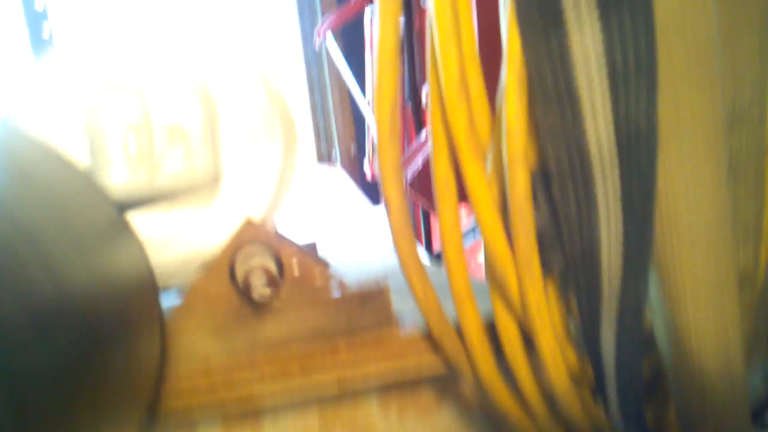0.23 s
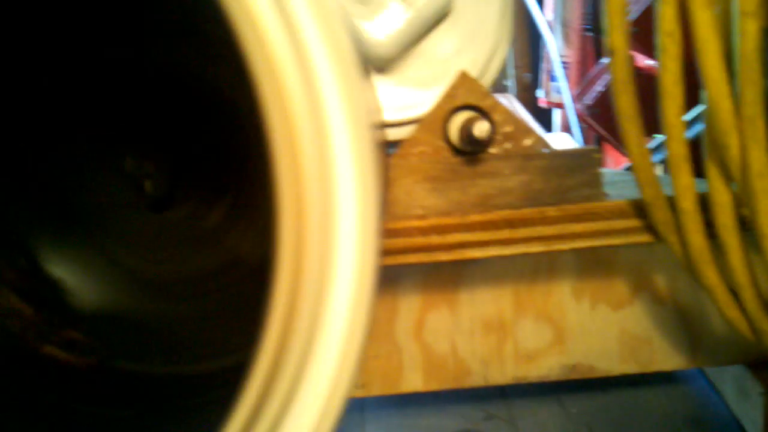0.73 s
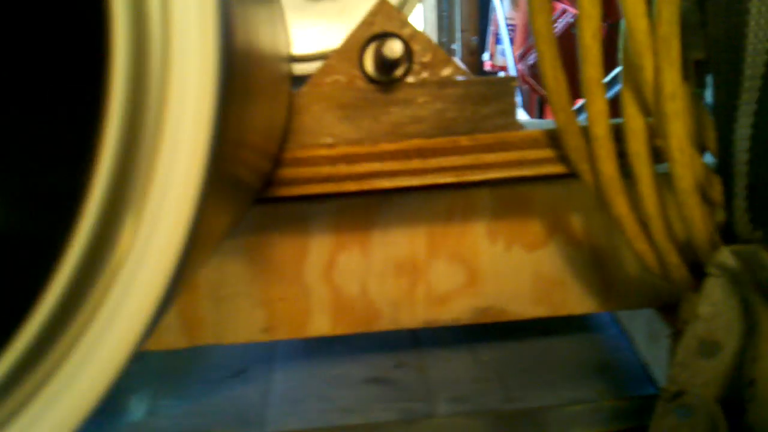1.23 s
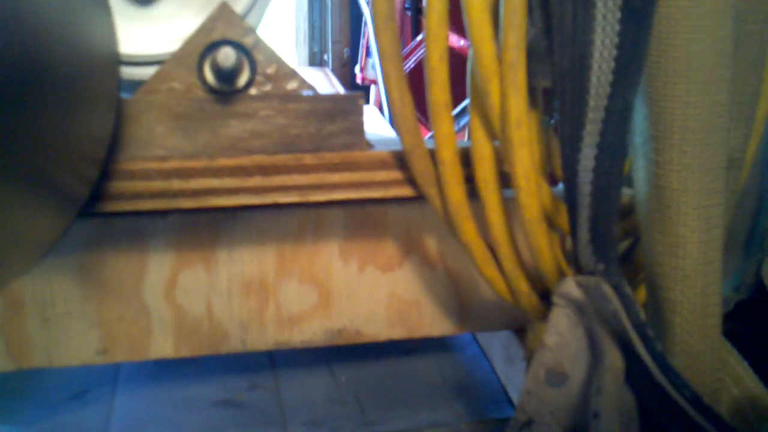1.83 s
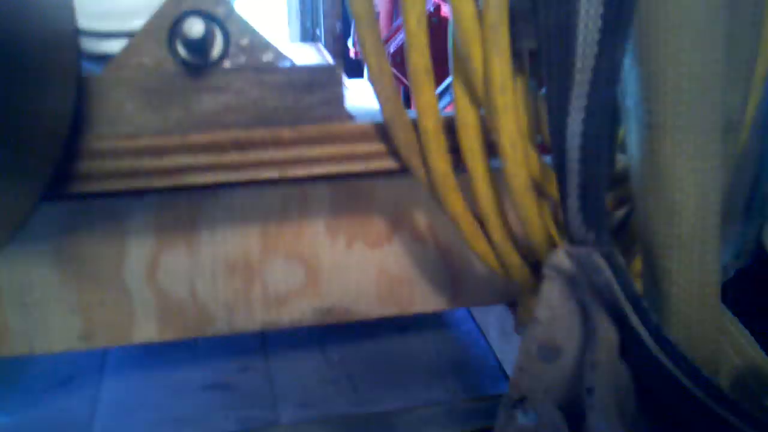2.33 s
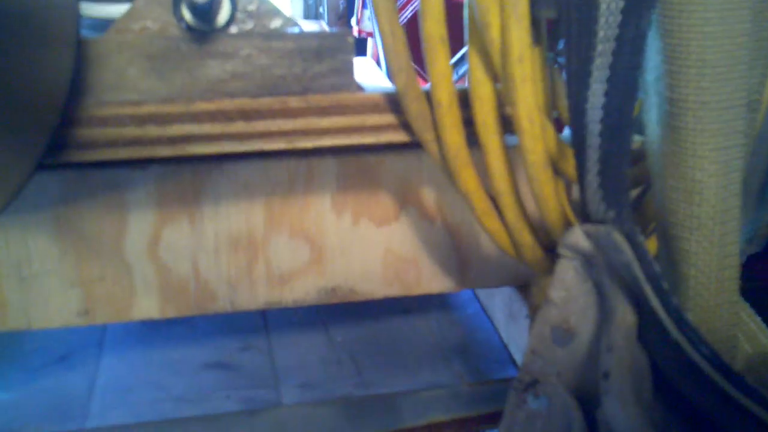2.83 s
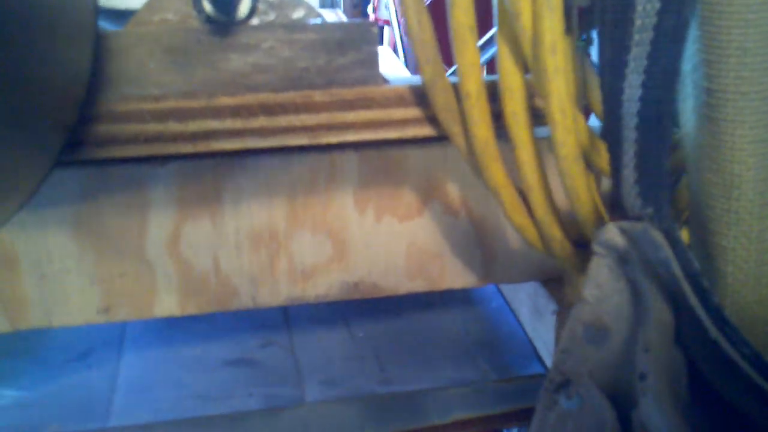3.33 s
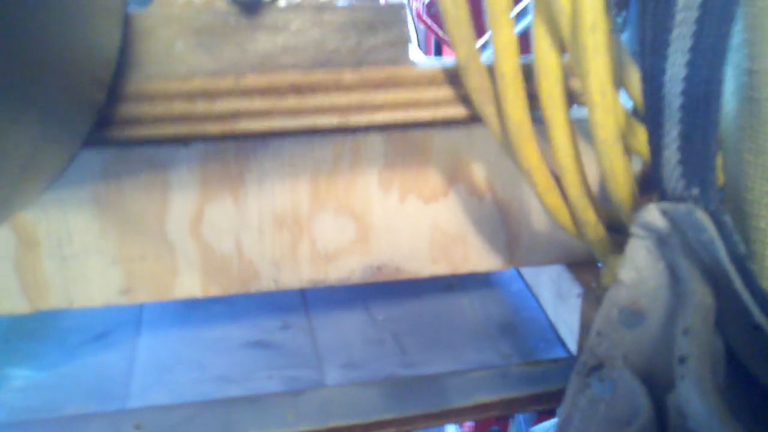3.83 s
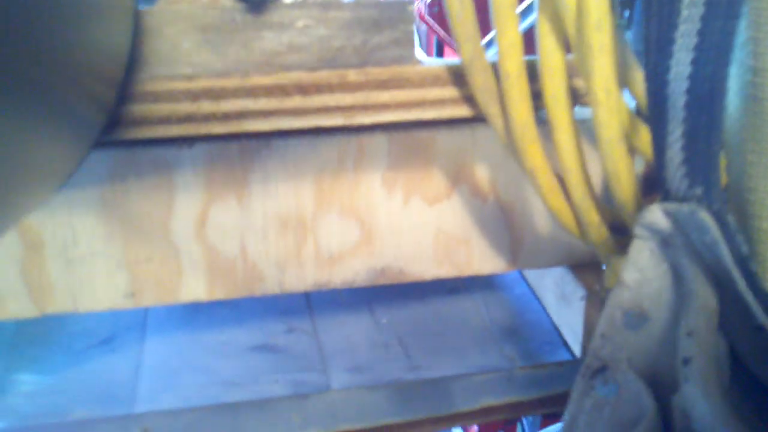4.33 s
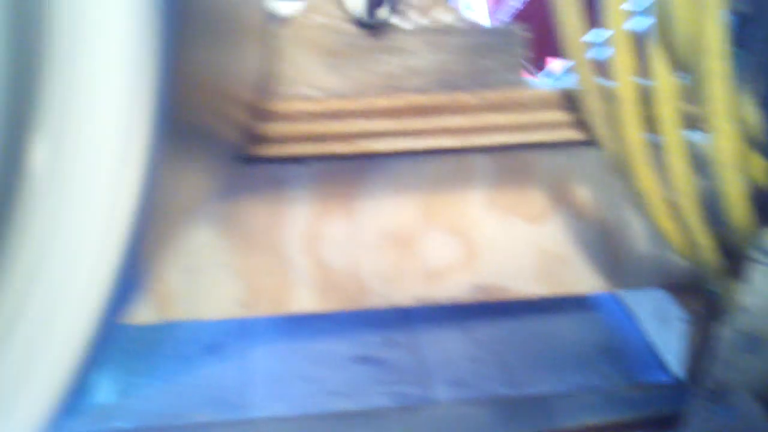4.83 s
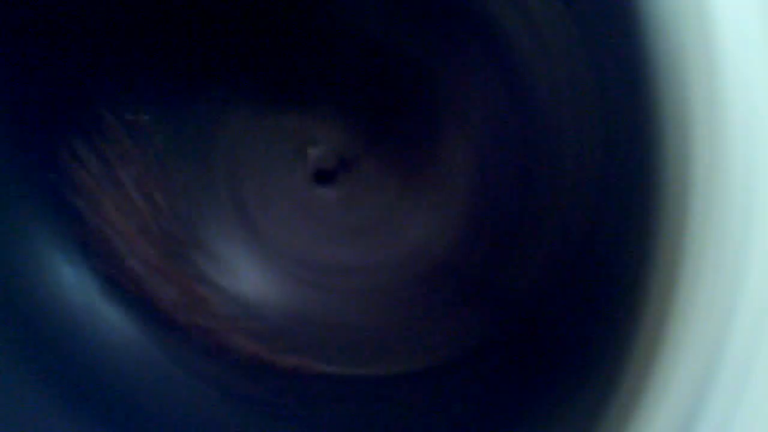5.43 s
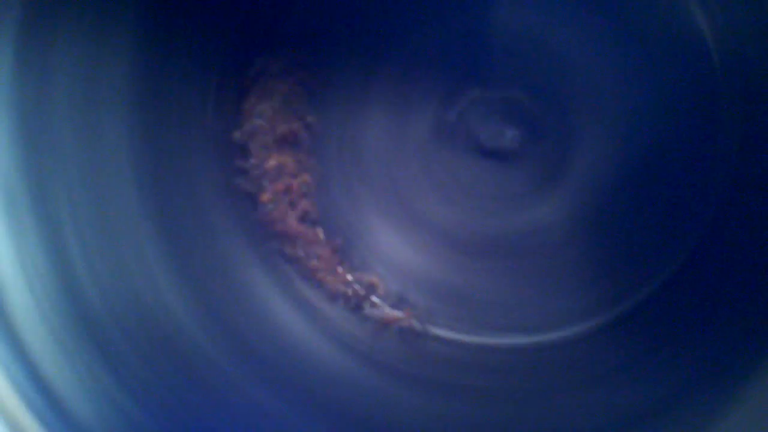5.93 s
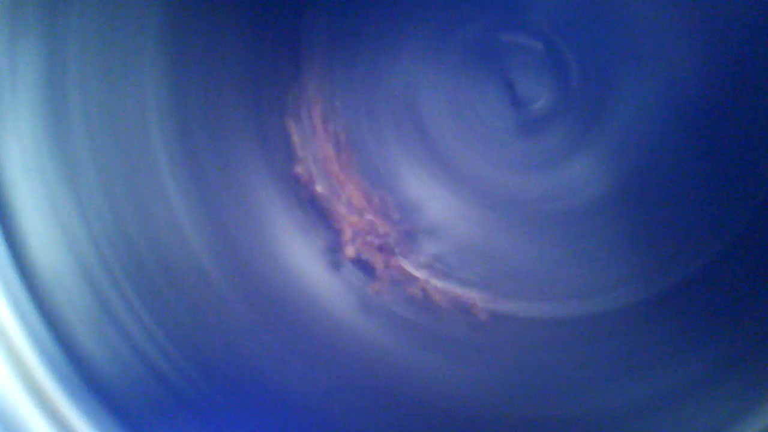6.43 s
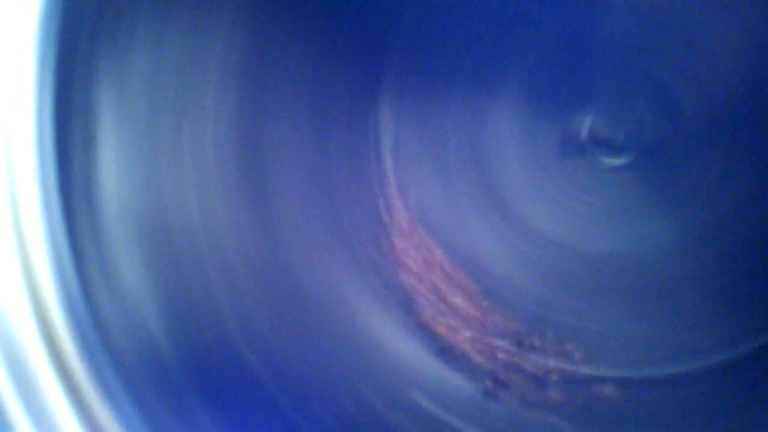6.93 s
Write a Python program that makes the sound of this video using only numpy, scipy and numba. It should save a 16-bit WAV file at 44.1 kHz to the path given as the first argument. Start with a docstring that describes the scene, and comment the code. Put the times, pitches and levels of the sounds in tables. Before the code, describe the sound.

A home-built drum mill rattles steadily up close, its charge tumbling with gritty hiss and irregular clacks over motor whine, a hard knock near the end.

```python
"""A home workshop: a ball mill's drum turns on motor-driven rollers in a wooden frame, by a hand-held camera.
The charge tumbles in bursts of tiny blows; ordinary clacks mark the roller's turns, others scatter among them.
Filtered grains hiss as grit, tones make the motor whine and metal sing, and a low resonance booms.
Near the end a knock and its rebound shake the camera's case; its gain control ducks on overload."""
import sys
import numpy as np
from scipy import signal
from scipy.fft import rfft, irfft, next_fast_len
from scipy.io import wavfile
from scipy.ndimage import uniform_filter1d
from numba import njit

SR = 44100
rng = np.random.default_rng(int(sys.argv[2]) if len(sys.argv) > 2 else 0)


def generate_wav(sig):
    """Save sig (samples, or channels by samples) to the path in sys.argv[1] as 16-bit PCM at SR."""
    pcm = np.round(np.clip(np.atleast_2d(sig).T, -1, 1) * 32767).astype(np.int16)
    wavfile.write(sys.argv[1], SR, pcm)


N = 317520
TIME = np.arange(N) / SR
SIZE = next_fast_len(N + 16384)
FREQ = np.maximum(np.arange(SIZE // 2 + 1) * SR / SIZE, 1)
PORT_LAG_S = 17 / SR
# turns per second; the small roller drives the drum
ROLLER_HZ, DRUM_HZ = 12.8, 2.38


def undb(db):
    """Decibels to gain."""
    return 10 ** (np.asarray(db) / 20)


def unit(x):
    """Scale to rms 1."""
    return x / np.sqrt(np.mean(np.abs(x) ** 2, axis=-1, keepdims=True))


def over_time(table):
    """Columns of a time table, joined by straight lines."""
    s, *columns = np.transpose(table)
    return [np.interp(TIME, s, c) for c in columns]


def over_pitch(table):
    """Columns of a spectrum, joined on a log-frequency axis."""
    hz, *columns = np.transpose(table)
    return [np.interp(np.log(FREQ), np.log(hz), c) for c in columns]


def walk(rate_hz):
    """Random levels held 1 / rate_hz and smoothed twice, rms 1."""
    hold = int(SR / rate_hz)
    steps = rng.standard_normal(N)[np.arange(N) // hold]
    return unit(uniform_filter1d(uniform_filter1d(steps, hold), hold))


def swell(x, width):
    """Bell-shaped rise, 1 at x = 0."""
    return np.exp(-(x / width) ** 2)


def ring(x, hz, width_hz):
    """One resonance, gain 1 at its centre."""
    return signal.lfilter(*signal.iirpeak(hz, max(hz / width_hz, 1), fs=SR), x)


def resonate(x, db):
    """Minimum-phase filter of the given dB shape; it keeps the energy of a click."""
    cepstrum = irfft(np.log(unit(undb(db))), SIZE)
    # folding the cepstrum makes the filter causal
    cepstrum[1:SIZE // 2] *= 2
    cepstrum[SIZE // 2 + 1:] = 0
    return irfft(rfft(x, SIZE) * np.exp(rfft(cepstrum)), SIZE)[..., :N]


def motor(wobble=0.0026, waver_db=1.6, load_db=1.6, load_place=0.61, hum_db=-62):
    """Shaft harmonics waver at random and swell once per drum turn, over a faint mains hum."""
    # motor shaft speed: start_s, turns_per_s
    shaft = [(0, 29.75), (.7, 29.55), (3.9, 29.6), (4.2, 29.45), (6, 29.48), (7.2, 29.56)]
    # whine partials: shaft_multiple, relative_db
    partials = [(23, -50), (24, -36), (25, -45.5)]
    # whine as the camera moves along the frame: start_s, relative_db
    course = [(0, -9), (.45, -2), (1.35, 0), (1.7, -8), (2.0, 0), (2.7, -1.5), (3.7, -1), (4.25, 1),
              (4.6, 2.5), (5.4, 2), (6.15, 2), (6.5, -3.5), (7.2, -3)]
    shaft_hz = over_time(shaft)[0] * (1 + wobble * walk(12))
    angle = 2 * np.pi * np.cumsum(shaft_hz) / SR
    whine = 0
    for multiple, db in partials:
        whine = whine + undb(db + waver_db * walk(15)) * np.sin(multiple * angle)
    load = np.cos(2 * np.pi * (DRUM_HZ * TIME - load_place))
    whine = whine * undb(over_time(course)[0] + load_db * load)
    hum = undb(hum_db) * np.sin(2 * np.pi * 120 * TIME)
    return np.sqrt(2) * np.array([whine + hum, np.zeros(N)])


def metal(wander_hz=10, flicker_db=4.0):
    """A rubbing metal part sings on close notes, unsteady in pitch and level."""
    # notes: pitch_hz, relative_db
    notes = [(3424, 0), (3564, -1.5), (3982, -9)]
    # fade and sag of the singing: start_s, level_db, pitch_shift_hz
    course = [(0, -44, 0), (1.0, -42.5, 2), (1.75, -43, 0), (2.0, -44, -20), (2.8, -49, -24),
              (5.8, -48, -17), (7.2, -51, -22)]
    level_db, shift_hz = over_time(course)
    singing = 0
    for hz, db in notes:
        flicker = unit(undb(flicker_db * walk(30)))
        phase = 2 * np.pi * np.cumsum(hz + shift_hz + wander_hz * walk(45)) / SR
        singing = singing + undb(db) * flicker * np.sin(phase)
    return np.sqrt(2) * np.array([singing * undb(level_db), np.zeros(N)])


def boom_db():
    """Boom level; the same rough places come round with every drum turn."""
    # rough places: place_turns (0-1), lift_db, half_width_turns
    rough_places = [(0.399, 10, 0.087), (.655, 9.5, 0.084), (.86, 11, 0.038)]
    # boom between the rough places: start_s, relative_db
    between = [(0, -43.5), (1.1, -41.5), (1.9, -37), (2.9, -42), (3.7, -40), (4.4, -40), (4.9, -38.5),
               (6.1, -36.5), (6.6, -40), (7.1, -35)]
    level_db = over_time(between)[0]
    for place, lift_db, half_width in rough_places:
        from_place = (DRUM_HZ * TIME - place + .5) % 1 - .5
        level_db = level_db + lift_db * swell(from_place, half_width)
    return level_db


def boom(hz=334, width_hz=10, evenness=0.71, gain_db=1.0):
    """A low drum resonance, kept ringing by the rolling load."""
    pole = np.exp((2j * np.pi * hz - np.pi * width_hz) / SR)
    swing = unit(signal.lfilter([1], [1, -pole], rng.standard_normal((2, N))))
    # evens out the random swell of the noise-driven ring
    even = swing.real / (np.abs(swing) + 0.15) ** evenness
    return unit(ring(even, hz, 126)) * undb(boom_db() + gain_db)


def bumps(t60_s=0.095, rise_s=0.0042, gain_db=6.5, count=8000):
    """Soft blows that each ring one low mode of drum or frame."""
    # soft bumps: start_s, relative_db, pitch_hz
    soft_blows = [(0.44, -23, 890), (0.632, -29, 887), (1.041, -23.5, 910), (1.256, -25, 887),
                  (1.507, -22, 906), (1.884, -26, 880), (2.062, -23, 907), (2.497, -22, 865),
                  (2.80, -35, 175.3), (3.193, -22, 898), (4.147, -27, 668), (4.87, -27, 920),
                  (5.155, -29, 580), (5.166, -27, 485), (5.479, -24, 917), (6.041, -23, 886),
                  (6.351, -18, 880), (7.162, -25, 870)]
    out = np.zeros((2, N + count))
    age_s = np.arange(count) / SR
    for s, db, hz in soft_blows:
        start = int(s * SR)
        envelope = undb(db + gain_db - 60 * age_s / t60_s) * np.minimum(age_s / rise_s, 1)
        out[0, start:start + count] += envelope * np.sin(2 * np.pi * hz * age_s)
    return out[:, :N]


def charge(swing_hz=1.73, peak_s=0.336, rattle_swing_db=0.25, grit_swing_db=1.14):
    """Levels of rattle and grit: the charge climbs the wall and slips back in a steady swing."""
    # busyness of the tumbling: start_s, rattle_db, grit_db
    busyness = [(0, -23.5, -35), (.6, -25, -36), (1.3, -23.5, -34), (2.1, -21, -31.5), (2.95, -23.5, -33.5),
                (3.7, -23.5, -32.5), (4.1, -22.5, -31.5), (4.9, -23.5, -34), (5.25, -23.5, -36.5),
                (5.7, -21.5, -32.5), (6.15, -21.5, -32.5), (6.5, -24, -31.5), (7.2, -22, -30)]
    # larger slides of grit: centre_s, lift_db, half_length_s
    slides = [(2.001, 2, 0.075), (3.212, 8, 0.042), (3.394, 5, 0.033), (6.08, 3.5, 0.085),
              (6.715, 4.5, 0.11)]
    rattle_db, grit_db = over_time(busyness)
    swing = np.cos(2 * np.pi * swing_hz * (TIME - peak_s))
    slides_db = sum(db * swell(TIME - s, half_s) for s, db, half_s in slides)
    return rattle_db + rattle_swing_db * swing, grit_db + grit_swing_db * swing + slides_db


def impacts(per_s, scatter_db):
    """Random tiny blows, mostly weak, a few strong; rows are direct and scattered sound."""
    hit = rng.random((2, N)) < per_s / SR
    size = undb(scatter_db * np.minimum(rng.exponential(size=(2, N)), 4))
    return unit(hit * size * rng.choice([-1, 1], (2, N)))


def tumble(per_s, scatter_db, flutter_db, edges_hz):
    """Pieces of each size strike on their own and fill their own band."""
    out = 0
    for low_hz, high_hz in zip(edges_hz, edges_hz[1:]):
        band = signal.butter(3, [low_hz, high_hz], "bandpass", fs=SR, output="sos")
        blows = impacts(per_s, scatter_db) * unit(undb(flutter_db * walk(45)))
        out = out + signal.sosfilt(band, blows)
    return out


def grit(level_db, gain_db=-1.03):
    """Fine grains slide down the drum wall: a dense, bright hiss."""
    # grit spectrum: pitch_hz, relative_db
    spectrum = [(500, -44), (2500, -2.5), (4000, 2.5), (5200, -4), (7500, 4.5), (9300, 1.5), (11000, 1.5),
                (14000, -3)]
    edges_hz = [300, 5500, 8000, 10500, 18000]
    grains = tumble(per_s=12000, scatter_db=2.5, flutter_db=2.5, edges_hz=edges_hz)
    return resonate(grains * undb(level_db + gain_db), over_pitch(spectrum)[0])


def tone_db():
    """Peaks and dips in the tone of tumbling and clacks."""
    # peaks and dips: pitch_hz, width_hz, change_db
    peaks_and_dips = [(215, 81, 1), (333, 45, 15), (424, 37, 9), (580, 40, -4.5), (694, 40, 3.5),
                      (858.5, 32, 4), (896, 65, 6), (1172, 80, 3.5), (1250, 55, 5.5), (1504, 114, 4),
                      (1673, 84, -2.5), (1810, 170, 2.5), (2100, 28, -0.5), (2610, 65, -11),
                      (2856, 134, 5.5), (3710, 125, 4.5)]
    return sum(db / (1 + (2 * (FREQ - hz) / width) ** 2) for hz, width, db in peaks_and_dips)


def roller_turns():
    """Turns of the roller so far; an ordinary clack is due at every whole number."""
    # the roller falls behind and catches up with the load: start_s, lag_turns
    lag = [(0, .78), (.45, .75), (.85, .65), (1.37, .59), (1.9, .68), (3.4, .71), (3.75, .57), (4.55, .55),
           (5.05, .71), (5.25, .85), (5.8, .76), (6.5, .55), (7.2, .62)]
    return ROLLER_HZ * TIME - over_time(lag)[0]


def jolts(rows, blow_db=18.5, chatter_db=25.5, chatter_s=0.012, lead_s=0.0032, ring_gain=2.23,
          ring_width_hz=350, gain_db=-5.5, count=2100):
    """Each row is a sharp blow inside a short chatter of jolted pieces; the spot struck adds its ring."""
    force = np.zeros((2, N + count))
    blow = count // 6
    age_s = (np.arange(count) - blow) / SR
    fade = np.exp(np.minimum(age_s / lead_s, -age_s / chatter_s))
    for s, db, row_chatter_db, hz in rows:
        pieces = rng.standard_normal((2, count)) * (rng.random((2, count)) < .08) * fade
        hit = undb(chatter_db + row_chatter_db) * unit(pieces) / np.sqrt(count)
        hit[0, blow] += undb(blow_db)
        # the scattered sound arrives a little later
        hit[1, blow + rng.integers(10, 60)] += undb(blow_db + 10)
        start = max(int(s * SR) - blow, 0)
        struck = hit + ring_gain * ring(hit, hz, ring_width_hz)
        force[:, start:start + count] += undb(db + gain_db) * struck
    return force[:, :N]


def ball_rows(spread_db=2.0, chatter_db=-4, stray_turns=.15, ring_hz=1300, ring_octaves=0.86, count=3):
    """A few balls drop in every roller turn, unevenly, each with its own force and ring."""
    turns = roller_turns()
    drops = np.arange(int(turns[-1]) * count) / count
    late, force, spot = rng.uniform(-1, 1, (len(drops), 3)).T
    times_s = np.interp(drops + stray_turns * late, turns, TIME)
    level_db = spread_db * np.sqrt(3) * force
    pitch_hz = ring_hz * 2 ** (ring_octaves * spot)
    return [(s, db, chatter_db, hz) for s, db, hz in zip(times_s, level_db, pitch_hz)]


def rattle(level_db, shake_db=0.3, bed_db=-2.05):
    """The charge strikes the wall, shaken three times per roller turn; single balls stand out."""
    # rattle spectrum: pitch_hz, relative_db
    spectrum = [(25, -78), (70, -25), (130, -17.5), (230, -5.5), (330, -10), (520, -0.5), (900, -1),
                (1300, -3.5), (2000, -1), (2700, 0.5), (3400, -7), (4300, -15), (6000, -15), (14000, -67)]
    shake = unit(undb(shake_db * np.cos(3 * 2 * np.pi * roller_turns())))
    edges_hz = [20, 600, 1250, 2300, 16000]
    blows = tumble(per_s=2000, scatter_db=1.4, flutter_db=1.57, edges_hz=edges_hz)
    force = blows * shake * undb(bed_db) + jolts(ball_rows())
    return resonate(force * undb(level_db), over_pitch(spectrum)[0] + tone_db())


def clack_rows(clear_s=.015, spread_db=2.5, chatter_db=-1, ring_hz=2200, ring_octaves=0.27, jitter_s=0.0028):
    """One varied clack per roller turn; a listed clack close by replaces an ordinary one."""
    # distinct clacks, weak and strong, of drum on rollers and balls on wall:
    # start_s, relative_db, chatter_db, pitch_hz
    listed = [(0.044, -20, 1.5, 3290), (0.115, -18.5, 0, 1500), (0.153, -9, -11, 3400),
              (0.296, -21, 1, 3140), (0.436, -20, 4, 895), (0.449, -14.5, -2.5, 2990),
              (0.505, -21.5, 4, 3280), (0.73, -15.5, -5, 2900), (0.779, -11.5, -0.5, 3380),
              (0.797, -20.5, 6.5, 3280), (0.833, -16.5, -4, 1700), (0.909, -19, -4, 1720),
              (0.927, -22.5, 0, 1760), (0.987, -19, -6, 1700), (1.143, -10, -6.5, 1680),
              (1.18, -21, 3.5, 947), (1.201, -19, -4, 2580), (1.297, -15, -5, 1570),
              (1.374, -16.5, -5.5, 1310), (1.453, -19, 2, 2820), (1.535, -11.5, -4, 2720),
              (1.667, -11, -5, 3060), (1.841, -16, -0.5, 1850), (1.928, -15, -6, 2800),
              (2.12, -17, -6, 907), (2.209, -17, 0, 3220), (2.226, -13, -2, 2410), (2.241, -18, -1, 1700),
              (2.277, -22, 4, 2530), (2.303, -17, -3, 3900), (2.319, -15, -18, 1860), (2.478, -21, 0, 1790),
              (2.499, -11, -4, 2100), (2.555, -18.5, 0, 1880), (2.608, -17, -15, 990),
              (2.686, -24, 2, 1720), (2.71, -12.5, -9, 2010), (2.866, -9.5, -10, 1910),
              (2.948, -20, -21, 1700), (3.024, -11, -12, 1690), (3.174, -16.5, -3, 2140),
              (3.255, -18, 1.5, 2930), (3.287, -19.5, 5.5, 3100), (3.336, -14.5, -4, 2110),
              (3.415, -21.5, 1, 1700), (3.428, -16, -6, 1720), (3.567, -15, -12, 1960),
              (3.642, -17, -14, 1900), (3.717, -20, -2, 1790), (3.941, -24, 4, 1090), (3.972, -16, 0, 3420),
              (4.033, -17.5, -2.5, 1790), (4.183, -16, -7, 2060), (4.263, -11.5, -4, 2380),
              (4.343, -20, -4, 1600), (4.418, -14.5, -8, 1650), (4.497, -22, -8, 2200),
              (4.575, -15, -7, 1970), (4.737, -12.5, -13, 1750), (4.816, -20, 1, 990),
              (4.835, -17.5, 0.5, 1550), (4.891, -20, -5, 1600), (4.973, -17, 4, 3250),
              (5.013, -16.5, -2, 3370), (5.058, -9, -1.5, 3130), (5.111, -18, -2.5, 1600),
              (5.132, -13.5, -6, 2470), (5.146, -15, -7, 1670), (5.222, -21, -3, 1800),
              (5.357, -21, 4, 3400), (5.377, -20.5, -5, 1590), (5.68, -17, -4, 860),
              (5.762, -16.5, 4, 2820), (5.78, -23, -2, 1100), (5.945, -24, 7, 1224), (6.038, -19, -8, 1000),
              (6.071, -11.5, -5, 2830), (6.105, -18.5, -4, 1300), (6.218, -15, -8, 1620),
              (6.298, -15, -9, 1870), (6.325, -11.5, -19, 1420), (6.339, -11.5, -5, 3500),
              (6.45, -15, -13, 1870), (6.601, -16, -10, 1780), (6.729, -20, 0.5, 1680),
              (6.757, -20.5, 1, 1500), (6.845, -11, -16, 1750), (6.984, -16, -1, 1790),
              (7.079, -17, -7, 1710), (7.1, -15, 1, 3360), (7.125, -13, 1, 3720)]
    # firmness of ordinary clacks: start_s, relative_db
    firmness = [(0, -22), (.65, -24), (1.0, -22), (3.0, -23), (4.4, -28), (5.3, -31.5), (7.2, -19)]
    turns = roller_turns()
    times_s = np.interp(np.arange(int(turns[-1]) + 1), turns, TIME)
    listed_s = np.array(listed)[:, 0]
    chance = rng.uniform(-1, 1, (len(times_s), 3)) * np.sqrt(3)
    rows = list(listed)
    for s, (late, force, spot) in zip(times_s, chance):
        if np.abs(listed_s - s).min() > clear_s:
            db = np.interp(s, *np.transpose(firmness)) + spread_db * force
            rows.append((s + jitter_s * late, db, chatter_db, ring_hz * 2 ** (ring_octaves * spot)))
    return rows


def wall_ring(rows, spread_db=2.5, detune=0.02, rise_s=0.00095, count=2600):
    """After each clack the drum wall rings briefly; the spot struck varies its modes."""
    # drum wall modes: pitch_hz, t60_s, relative_db
    wall_modes = [(1522, 0.04, -11.5), (1710, 0.028, -10), (1840, 0.046, -9.5)]
    out = np.zeros((2, N + count))
    age_s = np.arange(count) / SR
    hz, t60_s, mode_db = np.transpose(wall_modes)[:, :, None]
    chance = rng.standard_normal((len(rows), 2, len(wall_modes), 1))
    for (s, db, *_), (force, spot) in zip(rows, chance):
        decay = undb(db + mode_db + spread_db * force - 60 * age_s / t60_s)
        modes = decay * np.sin(2 * np.pi * hz * (1 + detune * spot) * age_s)
        start = max(int(s * SR), 0)
        out[0, start:start + count] += modes.sum(axis=0) * np.minimum(age_s / rise_s, 1)
    return out[:, :N]


def clacks():
    """Single contacts ring the drum and frame, brighter than the tumbling."""
    # clack spectrum: pitch_hz, relative_db
    spectrum = [(40, -19), (300, -6.5), (700, 5.5), (1150, 3), (1650, 10), (2100, 9), (2900, 1), (4000, 0),
                (5500, -11), (9000, -12), (14000, -18)]
    rows = clack_rows()
    return resonate(jolts(rows), over_pitch(spectrum)[0] + tone_db()) + wall_ring(rows)


def workshop(x, wet_db=-8, t60_s=0.089, change_hz=9, count=6000):
    """Drum, frame and bench reflect a short ragged tail; the paths change as the load shifts."""
    age_s = np.arange(count) / SR
    shares = np.array([walk(change_hz) for _ in range(4)])
    shares = shares / np.sqrt(np.sum(shares ** 2, axis=0))
    decay = undb(-60 * age_s / t60_s) * (age_s > .002)
    wet = 0
    for share in shares:
        tails = unit(rng.standard_normal((2, count)) * decay) / np.sqrt(count)
        wet = wet + signal.oaconvolve(x * share, tails, axes=1)[:, :N]
    # the nearby surfaces are too small to throw back the bass
    highpass = signal.butter(2, 1100, "highpass", fs=SR, output="sos")
    return x + undb(wet_db) * signal.sosfilt(highpass, wet)


def knock(push=0.69, push_s=0.002, crack=0.7, crack_s=0.0003, far_share=0.88, far_hz=2400, low_hz=150,
          soft_hz=2400, soft_rise_s=.0006, shudder_db=-15, shudder_hz=750, shudder_width_hz=700,
          shudder_s=0.0072, count=6000):
    """Crack, push, case ring and dull shudder at one port; the other gets them late, dull and inverted."""
    # camera case modes: pitch_hz, t60_s, relative_db
    case_modes = [(232, 0.043, -11), (380, 0.029, 0), (510, 0.069, -12), (615, 0.0045, 8.5),
                  (1020, 0.023, -3), (1850, .02, -17), (2720, 0.0013, 15.5), (4180, 0.0022, 14.5),
                  (6260, 0.0013, 11)]
    # a knock and its soft rebound: start_s, relative_db, hardness (0-1)
    touches = [(6.1745, 4.5, 0.83), (6.2024, -9, 0.3)]
    age_s = np.arange(count) / SR
    shove = push * np.sin(np.pi * np.minimum(age_s / push_s, 1))
    thud = np.zeros(N)
    for s, db, hardness in touches:
        noise = rng.standard_normal((2, count))
        modes = 0
        for hz, t60_s, mode_db in case_modes:
            # a soft touch leaves the high modes quiet
            strength = hardness ** (hz / soft_hz)
            decay = undb(mode_db - 60 * age_s / t60_s)
            modes = modes + strength * decay * np.cos(2 * np.pi * hz * age_s)
        modes = modes * (1 - (1 - hardness) * np.exp(-age_s / soft_rise_s))
        contact = hardness * crack * noise[0] * np.exp(-age_s / crack_s)
        dull = ring(ring(noise[1], shudder_hz, shudder_width_hz), shudder_hz, shudder_width_hz)
        shudder = undb(shudder_db) * unit(dull) * np.exp(-age_s / shudder_s)
        start = int(s * SR)
        thud[start:start + count] += undb(db) * (shove + contact - modes + shudder)
    # the small case passes little deep bass
    thud = signal.sosfilt(signal.butter(2, low_hz, "highpass", fs=SR, output="sos"), thud)
    far = signal.sosfilt(signal.butter(2, far_hz, fs=SR, output="sos"), thud)
    return np.array([-far_share * np.interp(TIME - PORT_LAG_S, TIME, far), thud])


def microphone(direct, scattered):
    """Two close ports, each minus the delayed other: mid and side get interleaved notches."""
    # port differences: pitch_hz, direct_gain, scattered_gain
    ports = [(60, 0.24, 0.11), (131, -0.1, 0.25), (244, -0.023, 0.15), (326, 0.4, 0.079),
             (470, -0.18, 0.32), (695, -0.15, 0.21), (1250, -0.12, 0.13), (2030, -1.12, 0.45),
             (2500, -1.17, 0.65), (3530, -0.22, 0.62), (4300, -0.26, 0.65), (5340, 0.056, 0.57),
             (14000, -0.042, 0.88)]
    # the drum stands to the left, its low notes lean that way: pitch_hz, left_minus_right_db
    left_lean = [(130, 0), (240, 3), (450, 3.8), (700, -1), (1900, -.8), (2400, 0), (3000, 0), (4500, -.5)]
    # how fully one port cancels the other: pitch_hz, share (0-1)
    cancel = [(60, .9), (500, .98), (2000, .99), (2900, .99), (4600, .62), (7000, .5)]
    lean, spread = over_pitch(ports)
    pan_db = over_pitch(left_lean)[0]
    late = over_pitch(cancel)[0] * np.exp(-2j * np.pi * FREQ * PORT_LAG_S)
    direct, scattered = rfft(direct, SIZE), rfft(scattered, SIZE)
    mid = (1 - late) * direct
    side = (1 + late) * (lean * direct + spread * scattered)
    # equalised to a flat overall response
    flat = np.sqrt(np.abs(1 - late) ** 2 + (lean ** 2 + spread ** 2) * np.abs(1 + late) ** 2)
    stereo = np.array([mid + side, mid - side]) * undb([pan_db / 2, -pan_db / 2])
    return irfft(stereo / flat, SIZE)[:, :N]


def scene():
    """The running mill at the microphone, and the knock on the case."""
    rattle_db, grit_db = charge()
    clatter = workshop(rattle(rattle_db) + clacks()) * undb(-.5)
    direct, scattered = clatter + grit(grit_db) + bumps() + metal() + boom() + motor()
    return microphone(direct, scattered) + knock()


@njit
def follow(peak, top, attack, release):
    """Peak follower that rises fast, sinks slowly and rests at top."""
    out, held = np.empty(len(peak)), top
    for i in range(len(peak)):
        if peak[i] > held:
            held = held + (peak[i] - held) * attack
        else:
            held = max(held * release, top)
        out[i] = held
    return out


def record(dry, top=0.83, ceiling=.93, recover_db_per_s=1.0, top_hz=14100):
    """Gain control ducks on overload and creeps back; the converter clips; the treble is cut."""
    release = float(undb(-recover_db_per_s / SR))
    held = follow(np.abs(dry).max(axis=0), float(top), 0.016, release)
    sound = np.clip(dry * top / held, -ceiling, ceiling)
    return signal.sosfilt(signal.ellip(10, .2, 70, top_hz, fs=SR, output="sos"), sound)


dry = scene()
out = record(dry)
generate_wav(out)
```